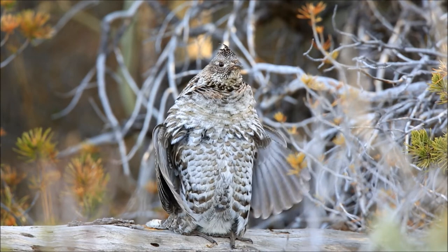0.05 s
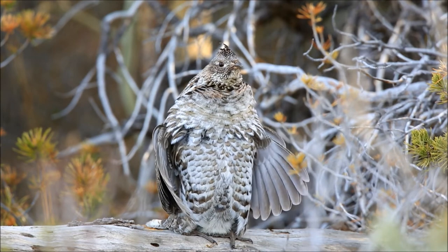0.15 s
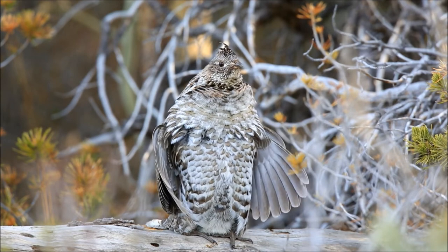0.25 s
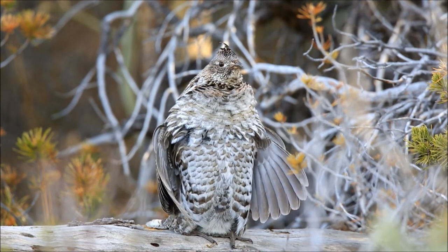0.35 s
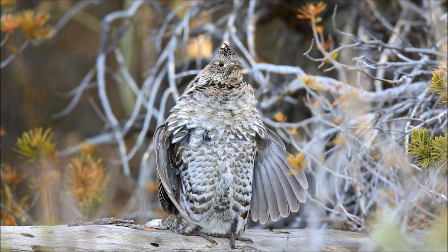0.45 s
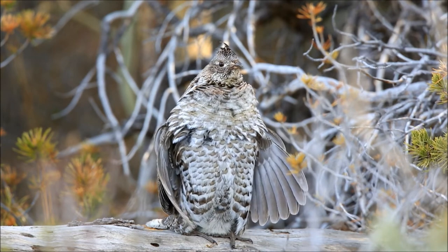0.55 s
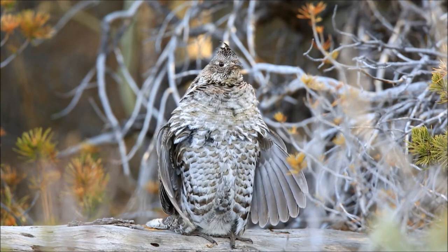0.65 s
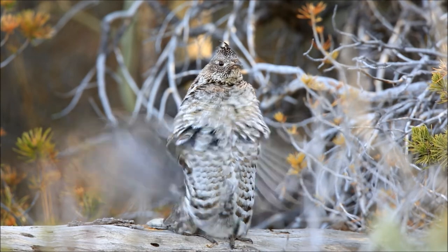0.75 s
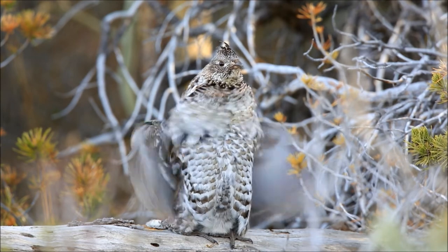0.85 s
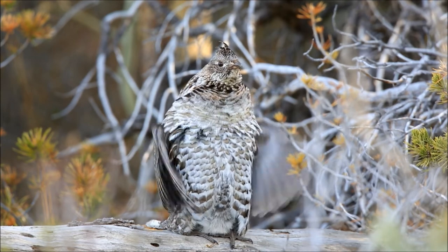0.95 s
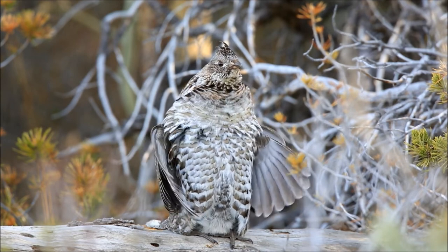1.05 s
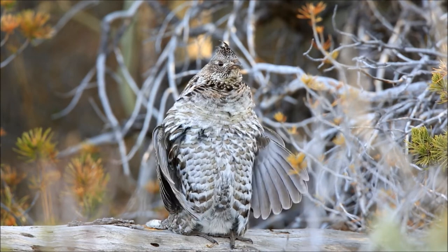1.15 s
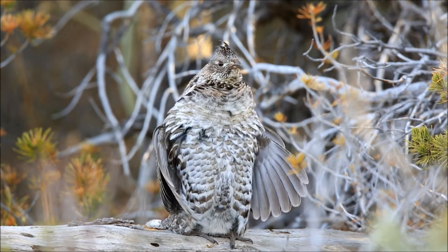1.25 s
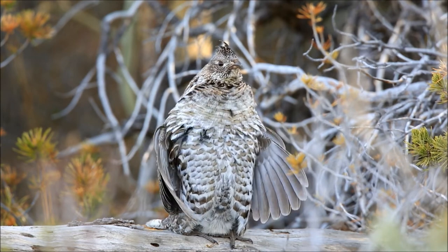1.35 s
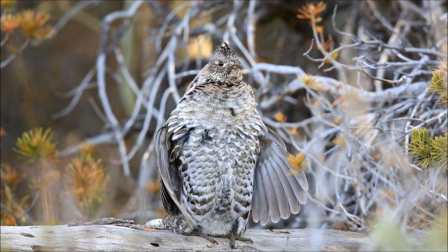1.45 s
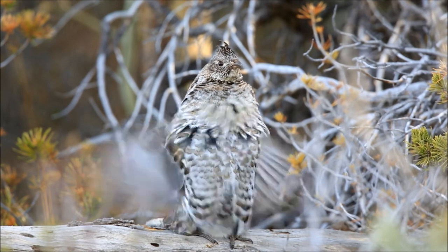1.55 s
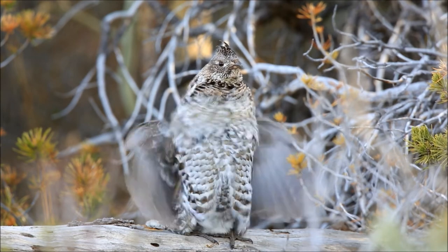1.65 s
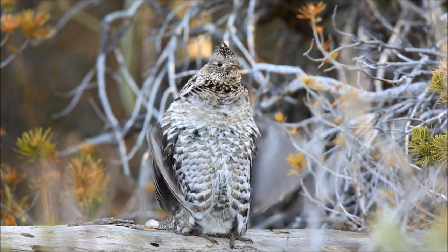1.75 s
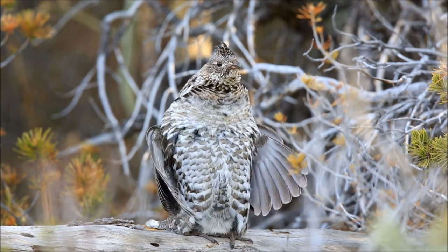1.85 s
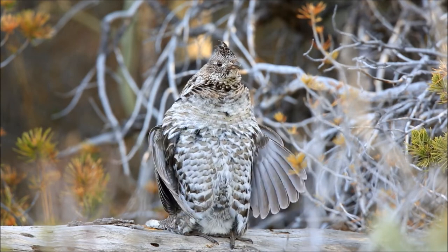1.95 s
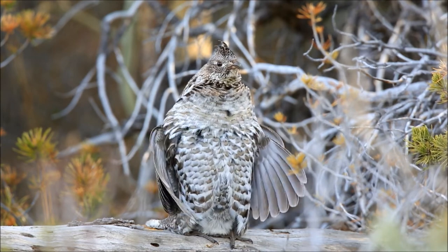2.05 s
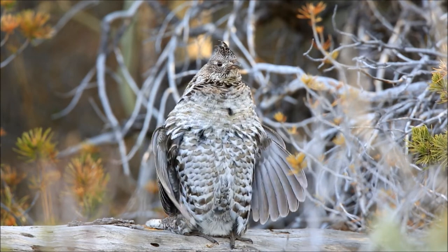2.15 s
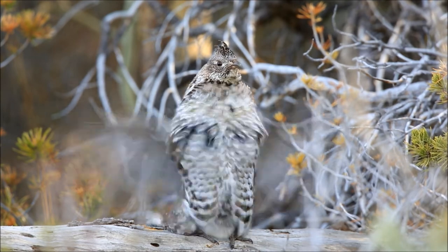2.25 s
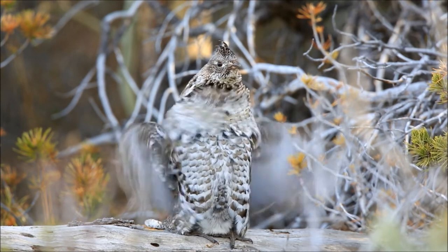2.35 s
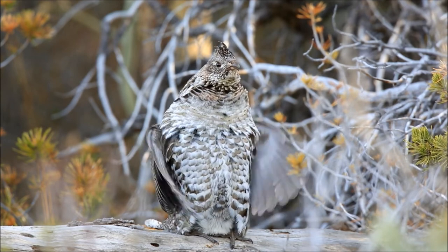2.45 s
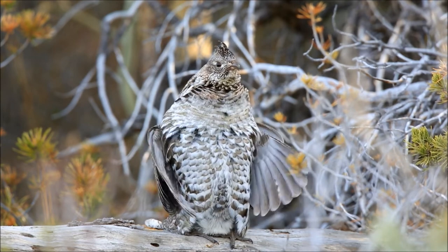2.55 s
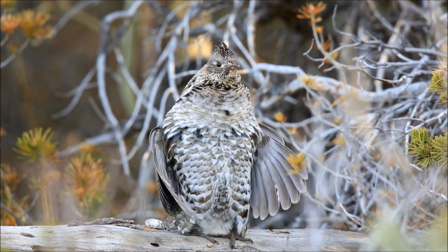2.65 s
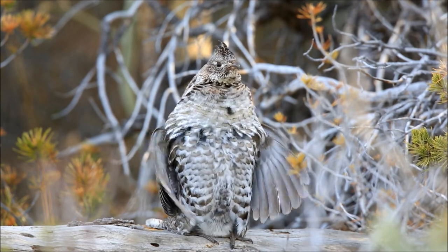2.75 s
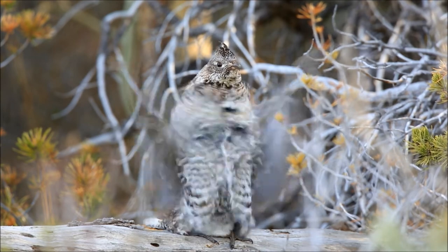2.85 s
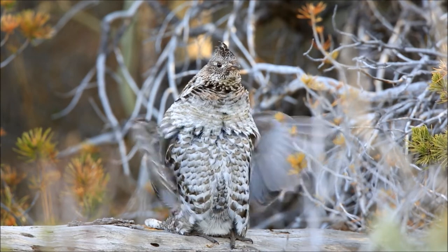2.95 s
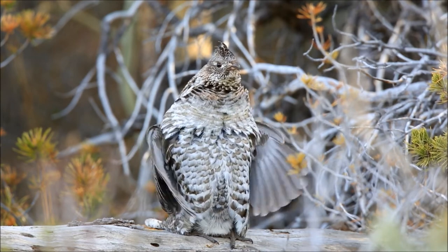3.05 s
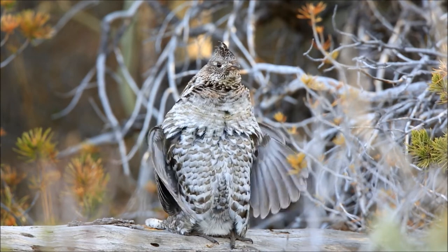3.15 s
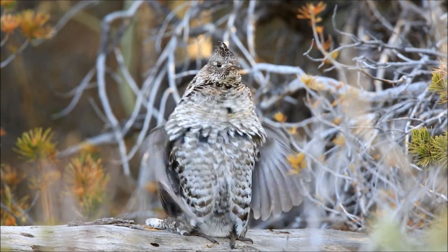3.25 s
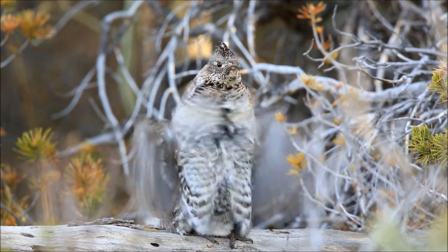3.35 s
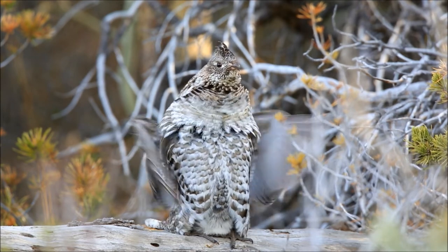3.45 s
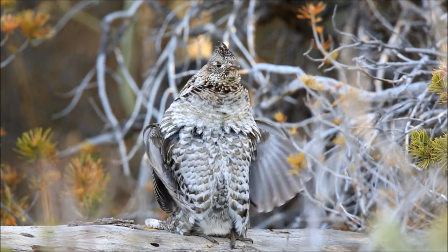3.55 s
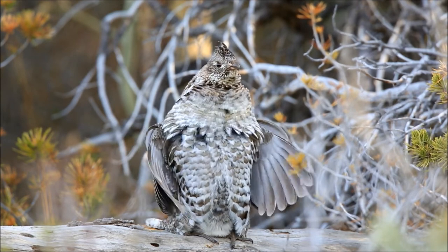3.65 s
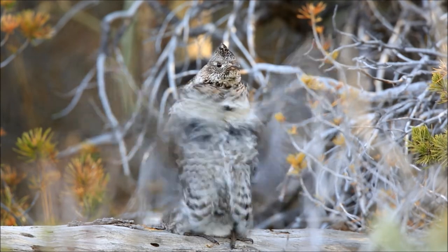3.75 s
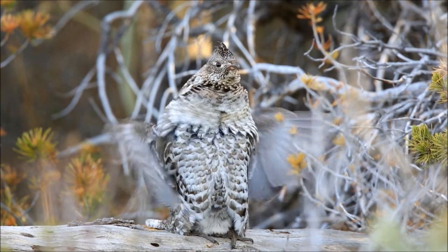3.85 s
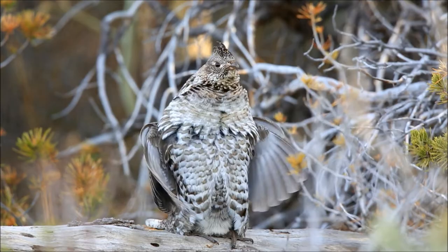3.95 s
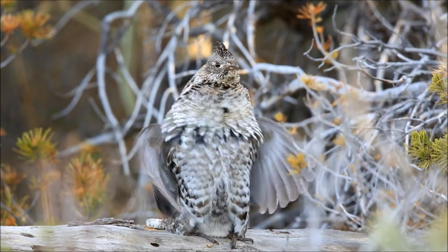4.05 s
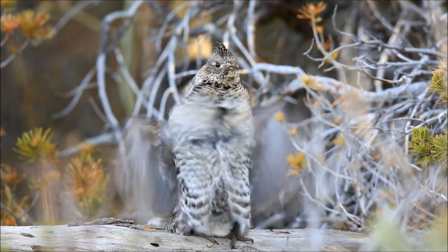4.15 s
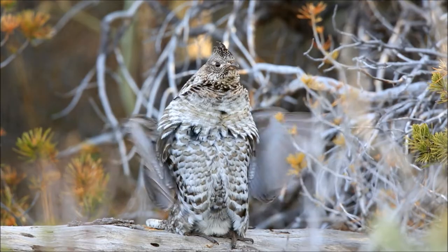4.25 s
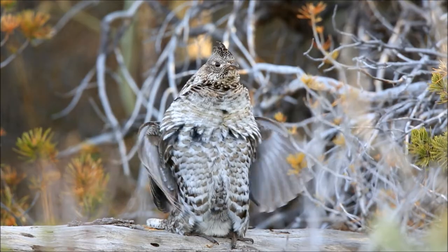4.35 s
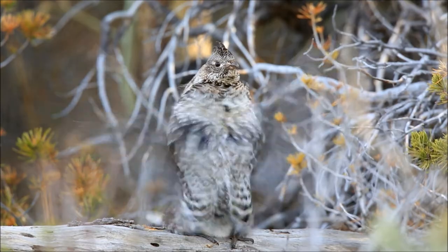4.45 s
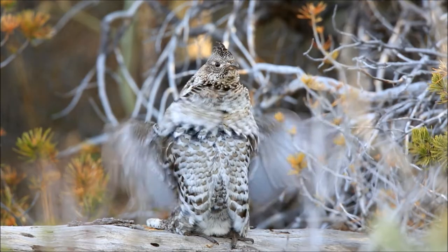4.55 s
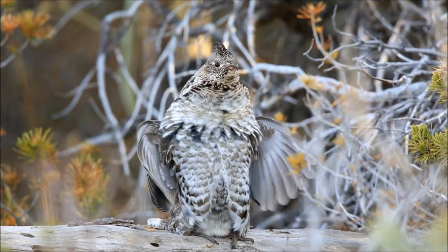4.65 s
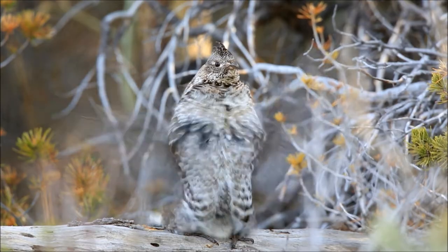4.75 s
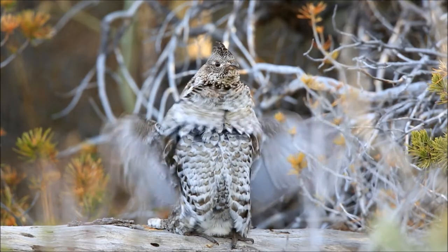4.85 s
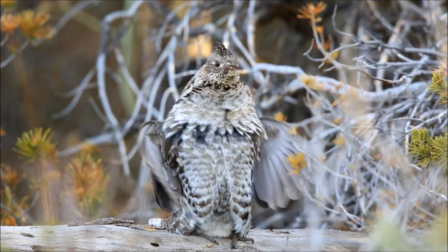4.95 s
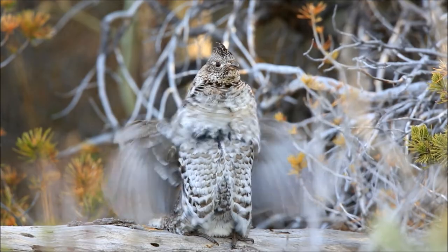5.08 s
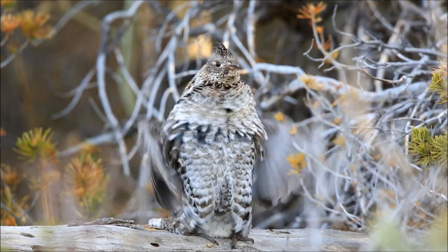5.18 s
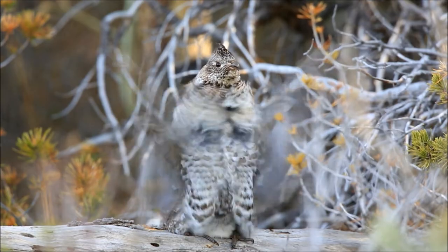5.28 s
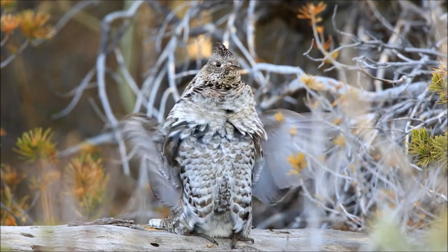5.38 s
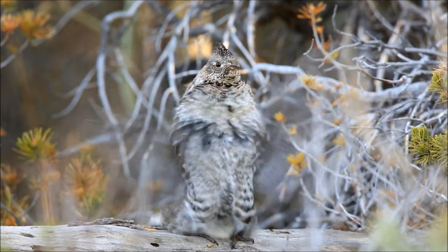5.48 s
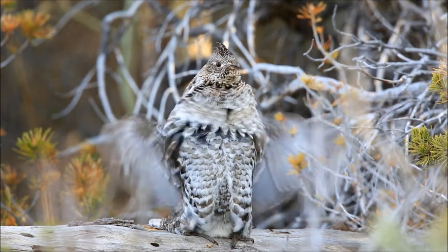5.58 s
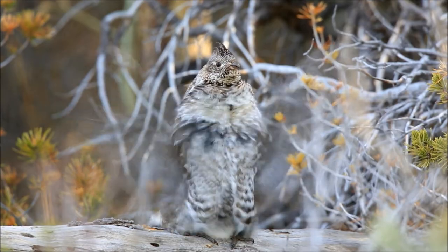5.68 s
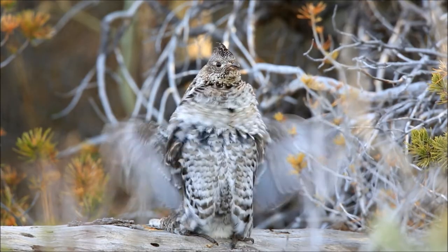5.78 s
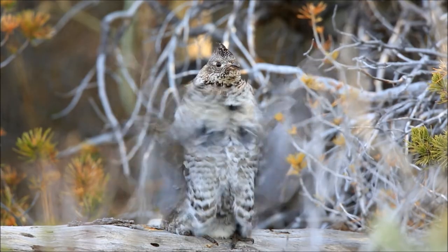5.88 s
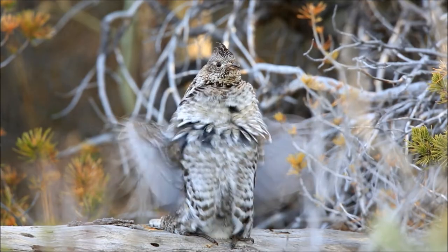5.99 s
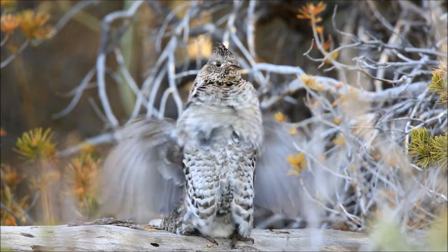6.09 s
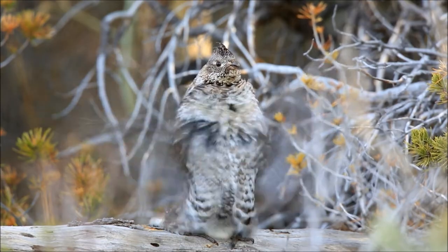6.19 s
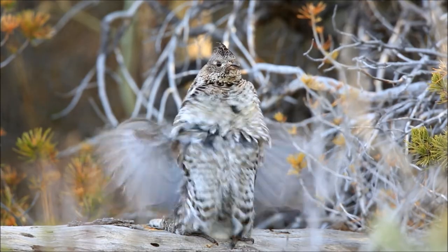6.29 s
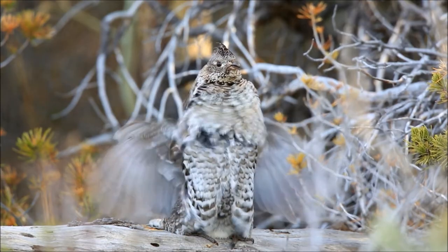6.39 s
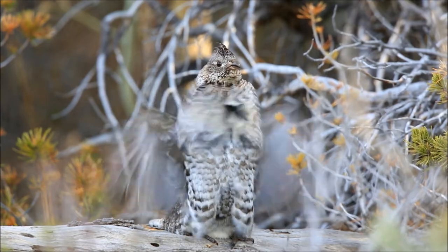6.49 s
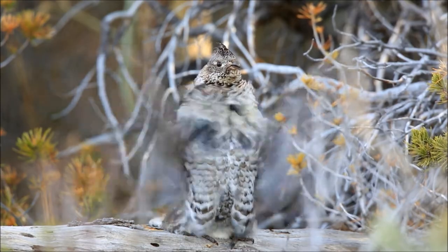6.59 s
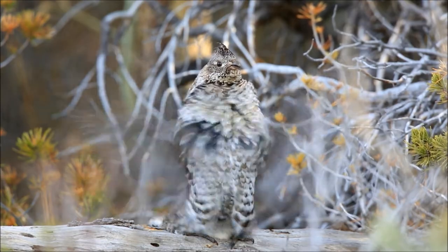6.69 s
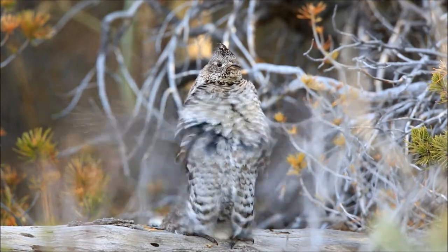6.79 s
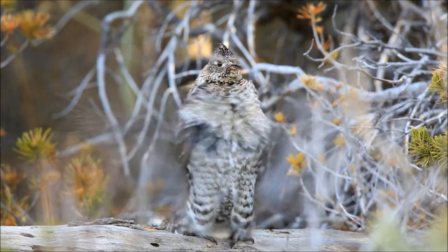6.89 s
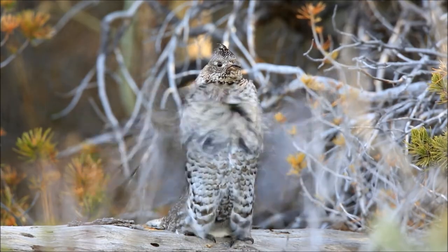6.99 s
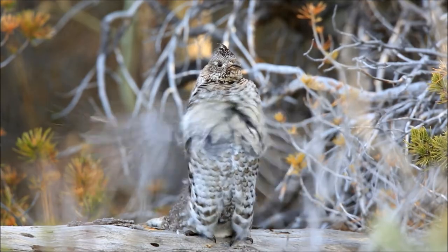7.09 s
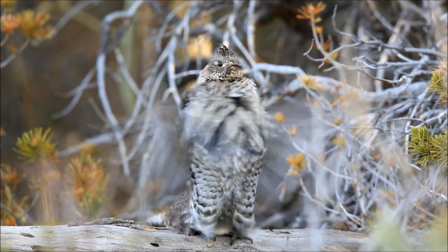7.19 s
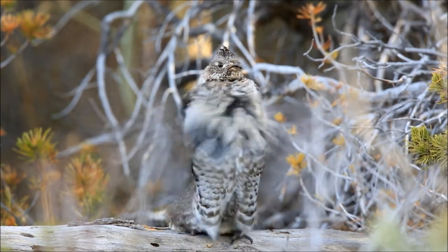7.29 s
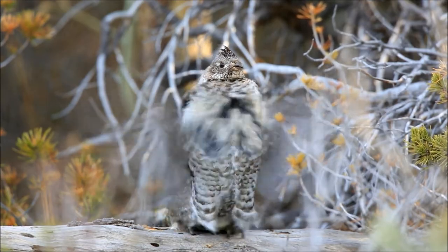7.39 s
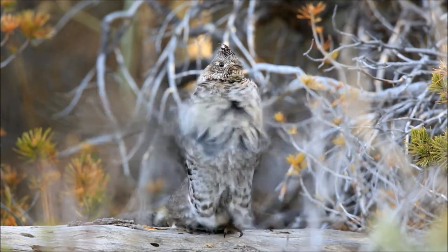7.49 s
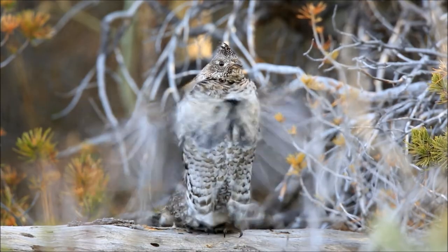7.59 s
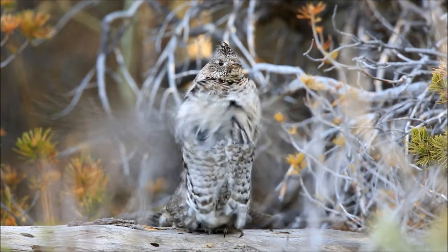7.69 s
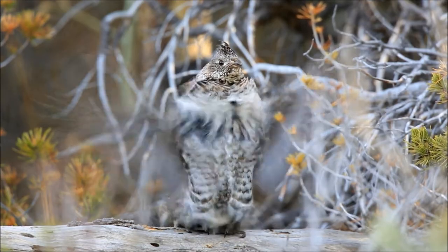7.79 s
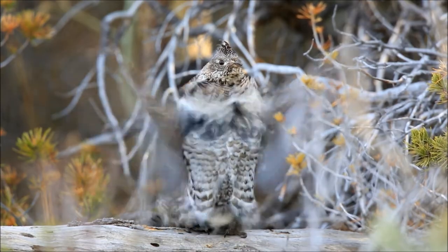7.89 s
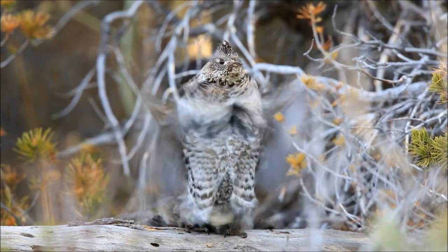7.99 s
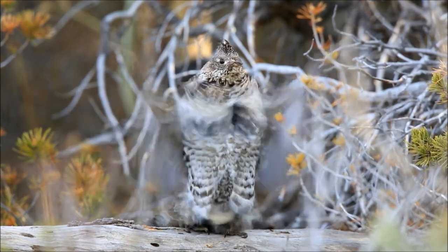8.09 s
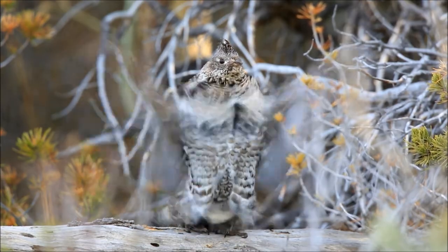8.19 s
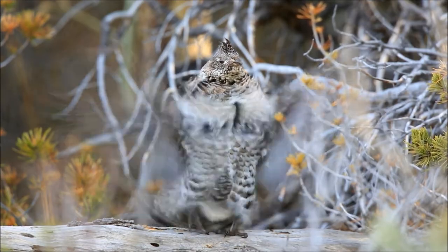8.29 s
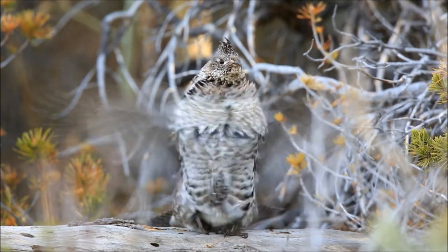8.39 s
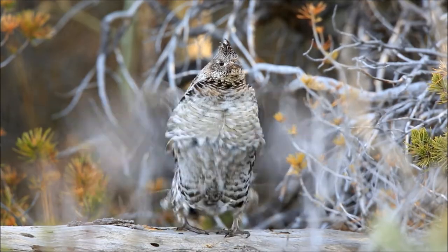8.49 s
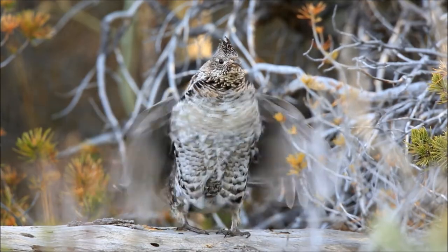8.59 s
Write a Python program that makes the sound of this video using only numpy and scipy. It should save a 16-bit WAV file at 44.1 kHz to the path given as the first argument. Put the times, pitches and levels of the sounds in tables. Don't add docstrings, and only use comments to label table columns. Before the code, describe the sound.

A grouse on a log beats its wings in quiet woodland. Deep, rounded thumps come singly at first, each with a faint feathery swish and short woody echo, then steadily closer until they blur into a fluttering roll. The roll slows slightly and weakens at the end. Behind it are soft air and hiss, a barely audible distant machine hum, faint bird whistles and a thin high trill. The microphone is fairly close, facing the bird.

```python
import sys
import numpy as np
from scipy import signal
from scipy.fft import rfft, irfft, next_fast_len
from scipy.io import wavfile
from scipy.ndimage import uniform_filter1d

SR = 44100
rng = np.random.default_rng(int(sys.argv[2]) if len(sys.argv) > 2 else 0)


def log_audio(samples):
    frames = np.atleast_2d(samples).T
    limited = np.clip(frames, -1, 1)
    pcm = np.round(limited * 32767).astype(np.int16)
    wavfile.write(sys.argv[1], SR, pcm)


def magnitude_from_level(level_db):
    exponent = np.asarray(level_db, float) / 20
    return 10 ** exponent


N = 380583

# hz, density_db_per_hz
AIR_MID = [(20, -1.5), (60, -1), (100, -6), (330, -13), (1300, -17.5), (4000, -20.5), (8000, -22.5),
           (15800, -22.5)]
# hz, density_db_per_hz
AIR_SIDE = [(20, -38), (70, -15), (150, -25), (400, -19), (1200, -20.5), (4200, -20.5), (7000, -23),
            (15800, -23.5)]
# middle_s, half_length_s, level_db
SWELLS = [
    (0.865, 0.31, -66.5),
    (1.67, 0.28, -68.5),
    (3.054, 0.49, -65.5),
    (4.203, .45, -74),
    (8.7, 0.14, -58),
]
# start_s, length_s, start_hz, end_hz, level_db
WHISTLES = [(.02, 0.14, 2620, 2780, -66), (1.7, 0.2, 2950, 2820, -74), (1.8, 0.13, 2630, 2500, -72),
            (2.33, .1, 2200, 2250, -72), (2.41, 0.13, 2650, 2310, -68.5), (2.9, .2, 2980, 2700, -72),
            (3.07, 0.17, 2780, 2450, -74), (5.37, .14, 3320, 3230, -72), (5.52, 0.064, 2490, 2480, -71),
            (5.92, 0.1, 3330, 3300, -71), (5.948, 0.16, 2870, 2780, -72), (6.15, 0.26, 2890, 2880, -70),
            (6.433, 0.118, 3330, 3240, -62.5)]
# turn_s, thump_peak_db, knock_db, snap_db, leading_quill_hz
BEATS = [(0.7875, -18.5, -47.5, -51, 1750), (1.6032, -15.5, -50.5, -49.5, 1610),
         (2.28, -13.5, -51.5, -48.5, 1710), (2.849, -13, -48.5, -47.5, 1650), (3.3363, -12, -47, -45, 1710),
         (3.761, -12.5, -47, -48.5, 1040), (4.1373, -12, -46.5, -46.5, 1670),
         (4.4726, -11.5, -46.5, -48, 3080), (4.775, -12.5, -49.5, -47.5, 1930),
         (5.0459, -12, -45, -47.5, 1630), (5.2883, -12.5, -50, -45, 1150), (5.506, -12.5, -47.5, -45, 1640),
         (5.7063, -12.5, -50.5, -47.5, 1020), (5.8875, -13, -47, -48, 3300),
         (6.0533, -13, -46.5, -47, 1790), (6.204, -13, -48.5, -47, 1320), (6.346, -13, -47.5, -46.5, 1720),
         (6.476, -13, -45, -48.5, 1620), (6.597, -14.5, -44.5, -47.5, 1650), (6.709, -14.5, -48, -48, 1230)]
# turn_s, thump_peak_db, knock_db, snap_db, leading_quill_hz
ROLL = [(6.8126, -15, -51, -47.5, 1700), (6.904, -15.5, -46, -50.5, 2600), (6.9863, -16, -50, -49.5, 1210),
        (7.0614, -15.8, -45.5, -48.5, 1650), (7.129, -16, -48, -47.5, 3280),
        (7.1922, -15, -46.5, -49, 1560), (7.2497, -14.2, -53, -49.5, 1680),
        (7.2988, -13.2, -46, -46.5, 1610), (7.345, -12, -43, -47, 1580), (7.398, -15, -55, -50, 1090),
        (7.4529, -16, -54, -50.5, 1060), (7.5133, -17, -48.5, -52, 1540), (7.579, -17.5, -49, -55.5, 3140),
        (7.6492, -17, -49, -53.5, 1750), (7.724, -18, -48.5, -50, 1060), (7.8055, -17.5, -47, -51.5, 2920),
        (7.8924, -18, -47.5, -53.5, 2190), (7.9862, -17.5, -50, -52.5, 1130),
        (8.084, -17.5, -47, -49, 3300), (8.1906, -18.5, -48.5, -52, 2700),
        (8.3021, -18.5, -47.5, -51, 1530), (8.42, -22, -51, -57, 2720), (8.548, -30.5, -59, -58, 1640)]
# centre_hz, width_hz, level_db
FEATHERS = [
    [(535, 395, 14.5), (725, 100, -4)],
    [(1040, 380, 0.5), (1680, 210, 1), (2490, 1100, 5), (3300, 180, -8)],
    [(5200, 4200, 10), (9200, 19000, -5)],
]
# width_hz, level_db
QUILL_RINGS = [
    (100, 12),
    (240, 8),
]
# lag_ms, rise_ms, fall_ms, level_db
SWISH = [
    (-14, 7.8, 5.4, 2),
    (16, 6., 6.7, 0.),
    (24, 12., 59, -9.5),
]
WAKE_TINT_DB = [-3, 2, 6, 6, 0, 0.1]
# lag_ms, signed_share
ECHOES = [(-16.3, -0.075), (-9.9, -0.112), (17.6, -0.095), (30.6, -0.06), (36.8, -0.048), (53.7, -0.047),
          (66.1, -0.006), (76.4, -0.037), (98.0, -0.013), (120.2, 0.018), (132.1, 0.011), (157.8, 0.012),
          (169.1, 0.007)]
# at_s, far_wing_lag_ms, far_wing_share, flick_re_thump_db
WINGS = [(.79, 3.86, .05, -14), (2.28, 3.16, .1, -23.5), (3.3, 2.5, 0.18, -25), (3.9, 2.85, 0.39, -40.5),
         (5., 2.93, 0.27, -27), (5.9, 3.2, 0.53, -23.5), (6.8, 3.16, 0.49, -23), (7.1, 3.55, 0.55, -17),
         (7.32, 2.4, 0.66, -28.5), (7.55, 3.73, 0.6, -21.5), (8.4, 3.5, 0.44, -18.5)]
# from_s, to_s
FOLDED = [(.264, .633), (.88, 1.48), (1.712, 1.732), (2.23, 2.268), (3.254, 3.325), (4.325, 4.505),
          (5.173, 5.288), (5.52, 5.775), (6.508, 6.56), (6.77, 6.835), (7.75, 7.86), (8.118, 8.132)]

AIR_DB, DRONE_DB = -55.5, -72
TRILL_S, TRILL_GAP_S, TRILL_DRAG_S = 1.959, 0.0593, 6.8e-5
TRILL_START_DB, TRILL_DB_PER_NOTE = -71, 0.1226
STROKE_LEAD_S = 0.04
SNAP_LEAD_S, SNAP_JITTER_S = 0.0028, 0.0012
KNOCK_HZ, KNOCK_SPREAD = 635, 0.13
HISS_DB, SWISH_DB, SCATTER_DB = -9.5, -7, 1.5
PLUCK = 3.5
BURST_DB = 2.5
WAKE_DB, WAKE_DB_PER_DECADE, WAKE_RATE_HZ, WAKE_LAG_S = -51.5, 57.5, 18.7, 0.025
BUFFET_HZ, BUFFET_WIDTH_HZ, BUFFET_DB = 190, 100.0, 2
PUSH_MS, PUSH_MS_PER_SHARE = 3.306, -0.66
TIRED_DB, TIRED_MS_PER_DB = -17.5, 0.2
FLICK_LEAD_MS = 1.83
FOLD_HZ, TOP_HZ = 4600, 15780


def colour(x, points):
    hz, db = np.transpose(points)
    size = next_fast_len(len(x))
    f = np.arange(size // 2 + 1) * SR / size + 1
    gain = magnitude_from_level(np.interp(np.log(f), np.log(hz), db))
    return irfft(rfft(x, size) * gain, size)[:len(x)]


def band(x, hz, width_hz):
    return signal.lfilter(*signal.iirpeak(hz, hz / width_hz, fs=SR), x)


def walk(rate_hz):
    hold = int(SR / rate_hz)
    steps = np.repeat(rng.standard_normal(N // hold + 1), hold)
    return 1.3 * uniform_filter1d(uniform_filter1d(steps, hold), hold)[:N]


def add(out, start_s, sound):
    i = int(round(start_s * SR))
    out[i:i + len(sound)] += sound[:max(len(out) - i, 0)]


def air():
    mid = colour(rng.standard_normal(N), AIR_MID)
    side = colour(rng.standard_normal(N), AIR_SIDE)
    low = signal.sosfilt(signal.butter(2, 300, fs=SR, output="sos"), mid)
    swell = mid + low * (magnitude_from_level(0.72 * walk(3.44)) - 1)
    return magnitude_from_level(AIR_DB) / mid.std() * np.array([swell + side, swell - side])


def drone(hum_hz=163, width_hz=3.0):
    hum = band(band(rng.standard_normal(N), hum_hz, width_hz), hum_hz, width_hz)
    steady = hum / np.sqrt(uniform_filter1d(hum ** 2, SR // 6))
    t = np.arange(N) / SR
    swells = sum(magnitude_from_level(db) * np.exp(-((t - s) / half_s) ** 4) for s, half_s, db in SWELLS)
    return steady * (magnitude_from_level(DRONE_DB) + swells)


def note(length_s, start_hz, end_hz, db, wobble):
    u = np.linspace(0, 1, int(length_s * SR))
    hz = (start_hz + (end_hz - start_hz) * u) * (1 + wobble)
    return magnitude_from_level(db) * np.sin(np.pi * u) * np.sin(2 * np.pi * np.cumsum(hz) / SR) * 2


def trill():
    out = np.zeros(N)
    for k, luck in enumerate(rng.standard_normal((40, 4))):
        at_s = TRILL_S + k * (TRILL_GAP_S + k * TRILL_DRAG_S)
        db = TRILL_START_DB + k * TRILL_DB_PER_NOTE
        falling = note(0.014, 4550, 3850, db - 1.5 + 2 * luck[0], 0.015 * luck[1])
        rising = note(0.013, 4800, 5500, db + 2 * luck[2], 0.012 * luck[3])
        add(out, at_s - 0.025, falling)
        add(out, at_s - 0.006, rising)
    return out


def whistles(blur_s=0.043, clear=0.16):
    far = np.zeros(N)
    for at_s, length_s, start_hz, end_hz, db in WHISTLES:
        wobble = 0.0402 * walk(70.1)[:int(length_s * SR)]
        add(far, at_s, note(length_s, start_hz, end_hz, db, wobble))
    t = np.arange(SR // 3) / SR
    trees = rng.standard_normal(len(t)) * np.exp(-t / blur_s)
    trees /= np.sqrt(np.sum(trees ** 2))
    return clear * far + signal.fftconvolve(far, trees)[:N]


def feathers(noise, modes, tint_db):
    return sum(magnitude_from_level(db + tint) * band(noise, hz, width) for (hz, width, db), tint in zip(modes, tint_db))


def puff(t_ms, lag_ms, rise_ms, fall_ms):
    rise = np.exp(-((t_ms - lag_ms) / rise_ms) ** 2)
    fall = np.exp(-np.abs(t_ms - lag_ms) / fall_ms)
    return np.where(t_ms < lag_ms, rise, fall)


def dulled(noise):
    return signal.sosfilt(signal.butter(4, 3650, fs=SR, output="sos"), noise)


def strokes_of_feathers(tint_db=2.0):
    out, strokes = np.zeros(N), BEATS + ROLL
    t_ms = np.arange(-1000 * STROKE_LEAD_S, 200, 1000 / SR)
    knocks, snaps, hisses = FEATHERS
    skirt = sum(magnitude_from_level(db) * puff(t_ms, lag, rise, fall) for lag, rise, fall, db in SWISH)
    shapes = [puff(t_ms, 1.62, 7.6, 5.4), puff(t_ms, 0, 6.1, 5.3), puff(t_ms, -0.54, 2.9, 13.5), skirt]
    noise = rng.standard_normal((len(strokes), len(shapes), len(t_ms)))
    for k in range(2):
        noise[:, k, shapes[k].argmax()] += PLUCK
    noise[:, [0, 1, 3]] = dulled(noise[:, [0, 1, 3]])
    tints = tint_db * rng.standard_normal((len(strokes), len(shapes), len(knocks + snaps)))
    lucks = rng.standard_normal((len(strokes), 4))
    knock_ring, snap_ring = QUILL_RINGS
    for (turn_s, _, knock_db, snap_db, quill_hz), airs, tint, luck in zip(strokes, noise, tints, lucks):
        knock_hz = KNOCK_HZ * np.exp(KNOCK_SPREAD * luck[0])
        knock_modes = knocks + [(knock_hz, *knock_ring)]
        snap_modes = snaps + [(quill_hz, *snap_ring)]
        snap_s = turn_s - SNAP_LEAD_S + SNAP_JITTER_S * luck[1]
        hiss_db = snap_db + HISS_DB + SCATTER_DB * luck[2]
        swish_db = (knock_db + snap_db) / 2 + SWISH_DB + SCATTER_DB * luck[3]
        parts = [(turn_s, knock_db, knock_modes), (snap_s, snap_db, snap_modes),
                 (snap_s, hiss_db, hisses), (turn_s, swish_db, knocks + snaps)]
        for (at_s, db, modes), shape, puffed, tone in zip(parts, shapes, airs, tint):
            burst = feathers(puffed * shape, modes, tone)
            level = np.sqrt(np.sum(shape ** 2) / np.sum(burst ** 2))
            add(out, at_s - STROKE_LEAD_S, magnitude_from_level(db + BURST_DB) * burst * level)
    return out


def wake_level():
    turns_s = np.array(BEATS + ROLL)[:, 0]
    middles_s = (turns_s[1:] + turns_s[:-1]) / 2
    rate_hz = np.interp(np.arange(N) / SR - WAKE_LAG_S, middles_s, 1 / np.diff(turns_s))
    return magnitude_from_level(WAKE_DB + WAKE_DB_PER_DECADE * np.log10(rate_hz / WAKE_RATE_HZ))


def swishes(grain_db=2.0):
    knocks, snaps, _ = FEATHERS
    wake = wake_level()
    churn = feathers(dulled(rng.standard_normal(N)), knocks + snaps, WAKE_TINT_DB)
    swish = strokes_of_feathers() + churn / churn.std() * wake
    grainy = swish * magnitude_from_level(grain_db * walk(600))
    buffet = band(rng.standard_normal(N), BUFFET_HZ, BUFFET_WIDTH_HZ)
    buffet = band(buffet, BUFFET_HZ, BUFFET_WIDTH_HZ)
    thin = signal.sosfilt(signal.butter(3, 320, "high", fs=SR, output="sos"), grainy)
    return magnitude_from_level(BUFFET_DB) * wake * buffet / buffet.std() + thin


def thumps(mic_hz=46.0, mic_q=1.23, tip_hz=360, tip_ms=3.54, tip_turn_rad=3.36, tip_sag_per_ms=0.14):
    out, size = np.zeros(N), 16384
    jw = 2j * np.pi * np.fft.rfftfreq(size, 1 / SR)
    w0 = 2 * np.pi * mic_hz
    mic = jw ** 2 / (jw ** 2 + jw * w0 / mic_q + w0 ** 2)
    wood = 1 + sum(share * np.exp(-jw * lag_ms / 1000) for lag_ms, share in ECHOES)
    t = np.arange(size) / SR - STROKE_LEAD_S + FLICK_LEAD_MS / 1000
    swing = np.exp(-(t * 1000 / tip_ms) ** 2 / 2)
    at_s, *controls = np.transpose(WINGS)
    for turn_s, db, *_ in BEATS + ROLL:
        lag_ms, share, flick_db = (np.interp(turn_s, at_s, c) for c in controls)
        push_ms = PUSH_MS + PUSH_MS_PER_SHARE * share + TIRED_MS_PER_DB * max(TIRED_DB - db, 0)
        bell = np.exp((jw * push_ms / 1000) ** 2 / 2)
        both_wings = 1 + share * np.exp(-jw * lag_ms / 1000)
        pulse = jw ** 3 * bell * both_wings * mic
        shove = irfft(pulse * wood * np.exp(-jw * STROKE_LEAD_S), size) / irfft(pulse, size).max()
        whip_hz = tip_hz * (1 - tip_sag_per_ms * lag_ms)
        whip = swing * np.cos(2 * np.pi * whip_hz * t + tip_turn_rad)
        flick = magnitude_from_level(flick_db) * irfft(rfft(whip) * wood)
        late_s = (lag_ms - 2.4) / 1100
        add(out, turn_s + late_s - STROKE_LEAD_S, magnitude_from_level(db) * (shove + flick))
    return out


def scene():
    singers = (trill() + whistles()) * magnitude_from_level(np.array([[0.8], [-0.8]]))
    grouse = (swishes() + thumps()) * magnitude_from_level(np.array([[0.07], [-0.07]]))
    return air() + drone() + singers + grouse


def band_limit(x):
    return signal.sosfilt(signal.butter(12, 16030, fs=SR, output="sos"), x)


def record(dry):
    t = np.arange(N) / SR
    fold = uniform_filter1d(sum(1.0 * (t > a) * (t < b) for a, b in FOLDED), 600)
    treble = signal.sosfiltfilt(signal.ellip(6, 0.1, 60, FOLD_HZ, "high", fs=SR, output="sos"), dry)
    middles = signal.sosfiltfilt(signal.butter(4, (350, 3900), "band", fs=SR, output="sos"), dry)
    power = uniform_filter1d(middles.mean(0) ** 2, 1024)
    loud = uniform_filter1d(1.0 * (power > magnitude_from_level(-50.5) ** 2), 400)
    mono_treble = magnitude_from_level(2.0) * treble.mean(0)
    mix = dry + fold * (mono_treble - treble) + loud * (middles.mean(0) - middles)
    pilot = magnitude_from_level(-84) * np.sin(2 * np.pi * 15734 * t)
    mix = signal.sosfilt(signal.ellip(10, 0.2, 70, TOP_HZ, fs=SR, output="sos"), mix + pilot)
    return band_limit(mix)


dry = scene()
out = record(dry)
log_audio(out)
```